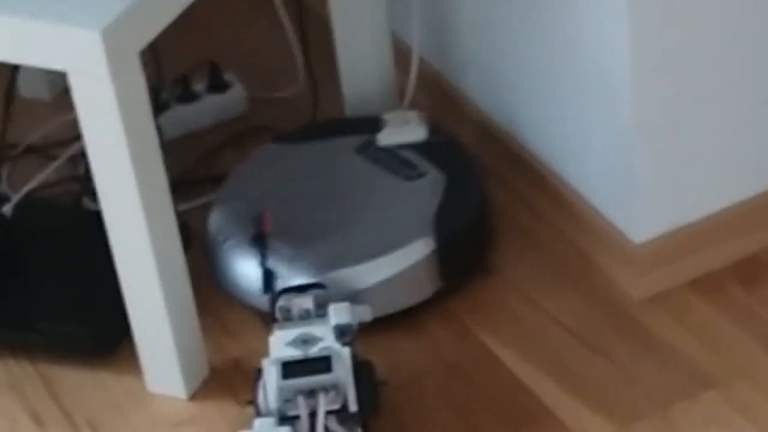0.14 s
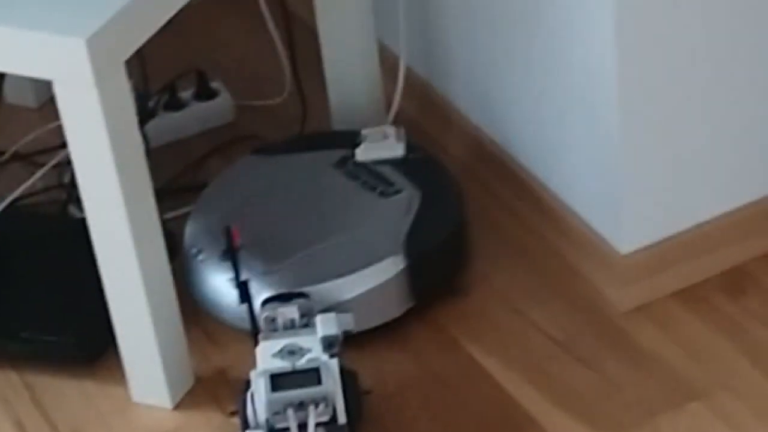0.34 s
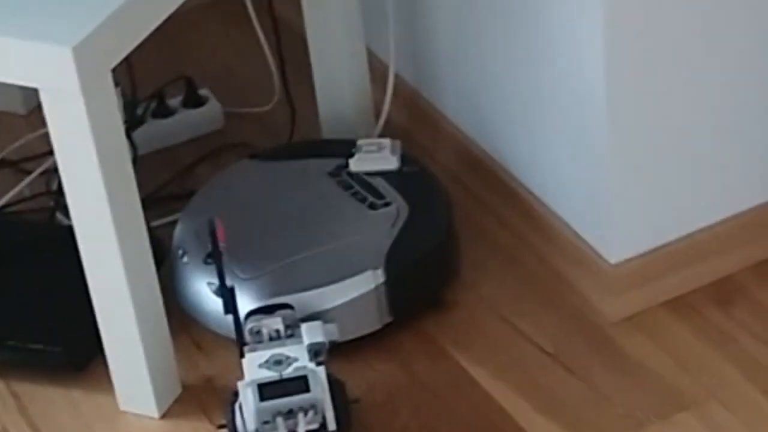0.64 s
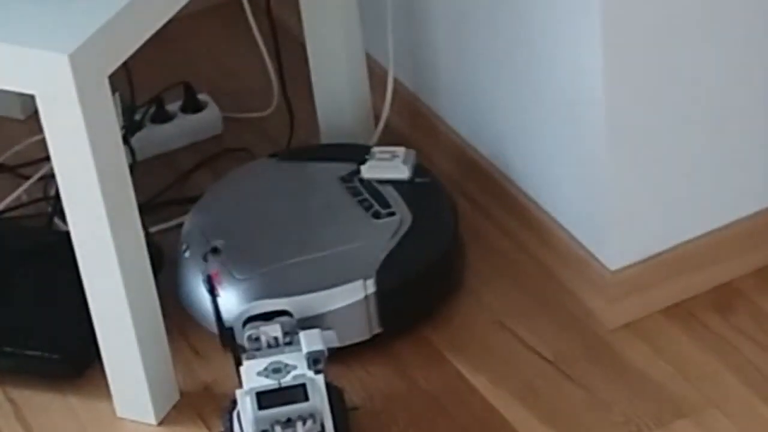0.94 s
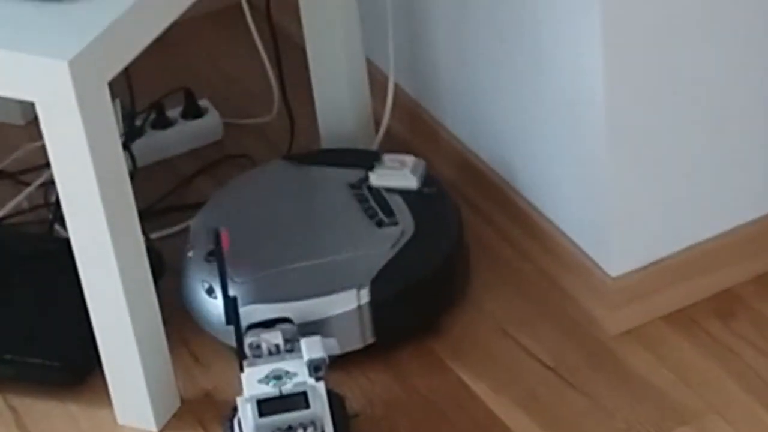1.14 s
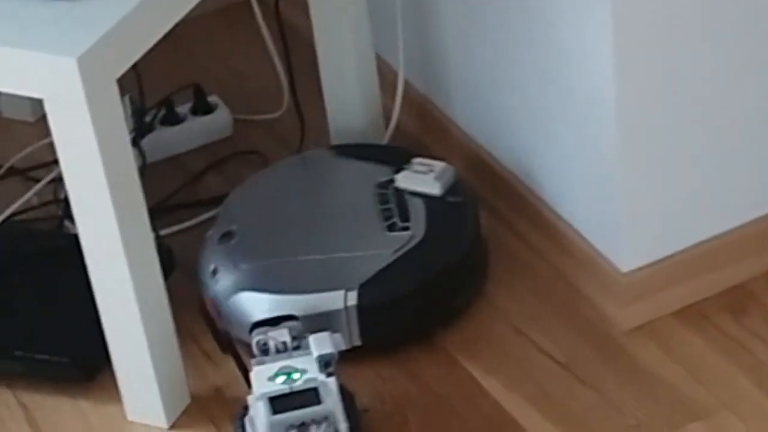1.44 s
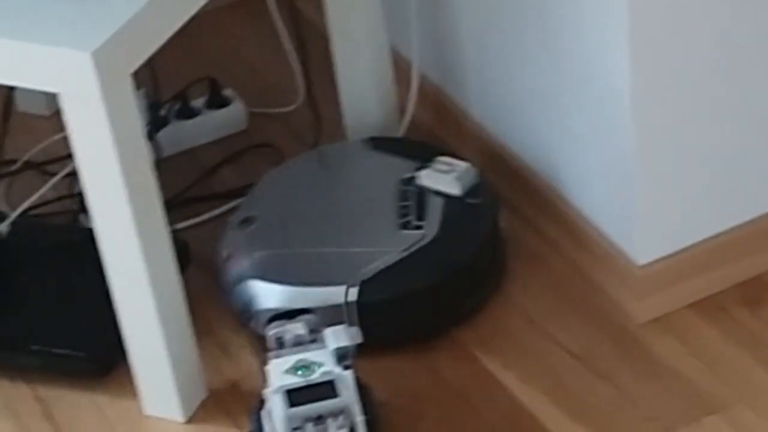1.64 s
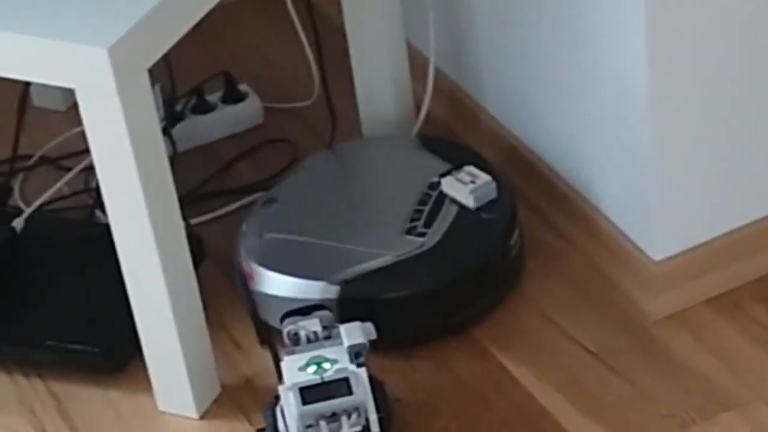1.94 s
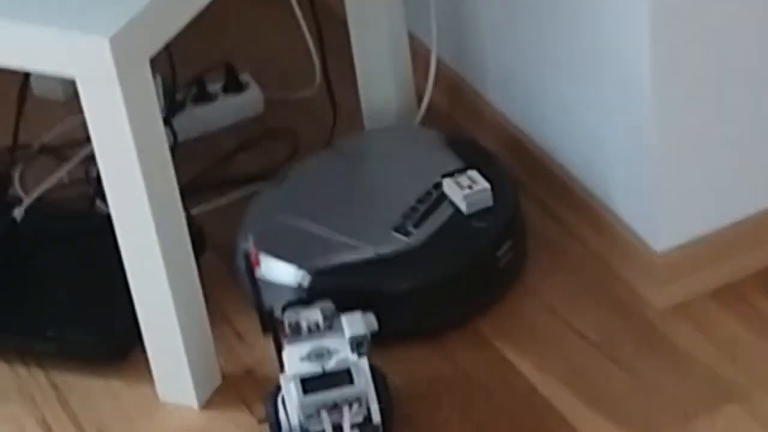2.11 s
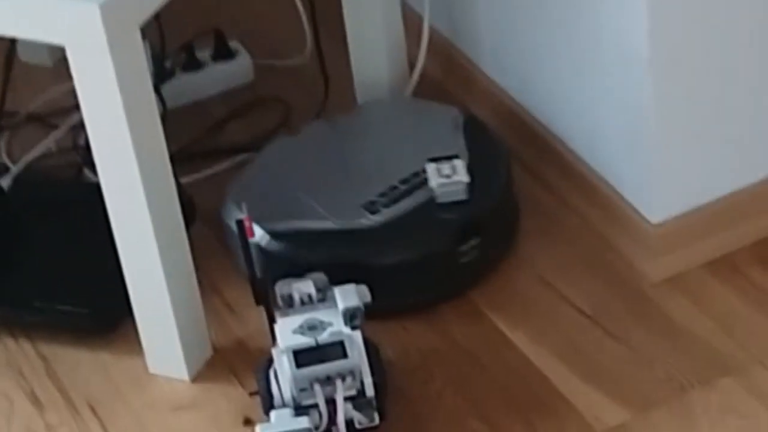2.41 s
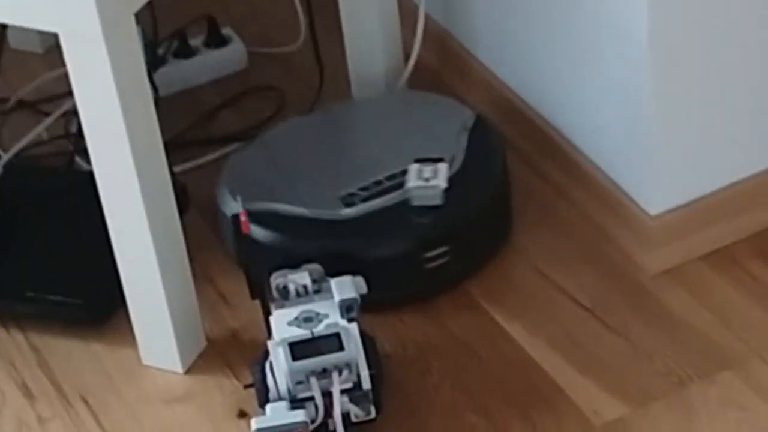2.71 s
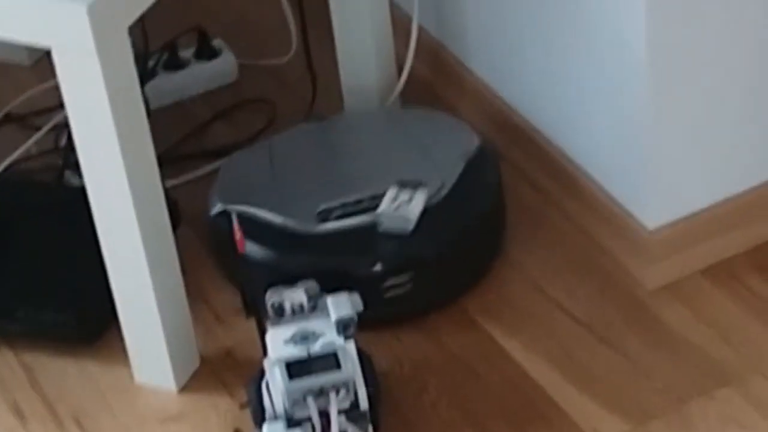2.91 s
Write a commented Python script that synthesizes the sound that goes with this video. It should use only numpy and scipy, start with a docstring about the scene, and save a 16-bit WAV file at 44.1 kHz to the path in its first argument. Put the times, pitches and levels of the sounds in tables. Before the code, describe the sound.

Steady vacuum motor hum and brush noise on a wooden floor indoors, joined from the start by a toy's grinding gears, thin squeals and plastic knocks, until after two seconds mostly the vacuum remains. Mono microphone, reverberant.

```python
"""A robot vacuum turns on a wooden floor in a bare, echoing room: motor harmonics hum, and noise whirs as brushes.
From the start a toy robot pushes against it for two seconds: random tooth impacts rasp, and thin tones whine.
Decaying impact noise and shell modes clatter in three bouts, near 0.2, 1.3 and 1.6 s.
From about 1.1 s a low motor note comes up; after 2.1 s the rasp sinks away, leaving the vacuum and a few whines.
Throughout, the whole sound flutters evenly, about 29 times a second; both channels are identical (mono)."""
import sys
import numpy as np
from scipy import signal
from scipy.fft import rfft, irfft, next_fast_len
from scipy.io import wavfile
from scipy.ndimage import map_coordinates

SR = 44100
rng = np.random.default_rng(int(sys.argv[2]) if len(sys.argv) > 2 else 0)


def log_audio(samples):
    """Write samples as a 16-bit WAV file to the path given in sys.argv[1]."""
    # one column per channel
    frames = np.atleast_2d(samples).T
    # limit to full scale, then quantise
    limited = np.clip(frames, -1, 1)
    pcm = np.round(limited * 32767).astype(np.int16)
    wavfile.write(sys.argv[1], SR, pcm)


N = 134946  # samples

MOTOR_HZ = 48.18  # fundamental of the vacuum's motor
MOTOR_ROOM_DB = 4  # echo of brushes, gears and scraping, relative to their direct sound


def amp(db):
    """Decibels to amplitude: 20 dB is a factor of ten."""
    return 10 ** (np.asarray(db) / 20)


def evened(x):
    """Normalization by effective value: scales to an rms of one."""
    return x / np.sqrt(np.mean(x ** 2) + 1e-20)


def level(points):
    """Amplitude envelope: gain over time, linear in decibels between (s, dB) points."""
    return amp(np.interp(np.arange(N) / SR, *np.transpose(points)))


def read(points, hz):
    """Spectral interpolation: reads (Hz, value) points on a log-frequency axis."""
    f, value = np.transpose(points)
    return np.interp(np.log(hz + 1), np.log(f + 1), value)


def add(mix, s, sound):
    """Superposition: mixes a sound in at a time in seconds."""
    part = mix[max(round(s * SR), 0):][:len(sound)]
    part += sound[:len(part)]


def colour(x, gain_db, size=4096):
    """Minimum-phase filtering: a causal response with the gain that gain_db gives for each frequency."""
    log_gain = np.log(amp(gain_db(abs(np.fft.fftfreq(size, 1 / SR)))))
    response = np.exp(np.conj(signal.hilbert(log_gain)))
    taps = np.fft.ifft(response).real[:size // 2]
    return signal.fftconvolve(x, taps)[:len(x)]


def band(hz, width_hz, size=N):
    """Resonance: noise confined to one narrow band, with an rms of one."""
    padded = next_fast_len(size, True)
    f = np.fft.rfftfreq(padded, 1 / SR)
    resonance = 1 / (1 + (2 * (f - hz) / width_hz) ** 4)
    noise = rfft(rng.standard_normal(padded))
    return evened(irfft(noise * resonance, padded)[:size])


def ticks(per_s, spread_db, size):
    """Random impulse train: tiny impacts of uneven strength and random sign."""
    strength = amp(spread_db * np.minimum(rng.exponential(1, size), 4))
    struck = rng.random(size) < per_s / SR
    return strength * rng.choice([-1., 1.], size) * struck


def drift(per_s, order=400):
    """Random modulation: straight lines join per_s normal random values each second."""
    return np.interp(np.arange(N) / SR * per_s, np.arange(order), rng.standard_normal(order))


def tones(pitches, gains, fading, fade_hz, wander, wander_per_s):
    """Modulated partials: lines fade in and out on their own while one shared speed bends them all."""
    f, spectrum = np.fft.rfftfreq(N, 1 / SR), np.zeros(N // 2 + 1, complex)
    near = np.arange(-60, 61)  # bins around each line
    skirt = np.exp(-.5 * (near * f[1] / fade_hz) ** 2)
    # a steady centre, with random sidebands that make the line fade
    line = fading * skirt / np.linalg.norm(skirt) + (near == 0)
    for hz, gain in zip(pitches, gains):
        phases = np.exp(2j * np.pi * rng.random(len(near)))
        spectrum[round(hz / f[1]) + near] += gain * line * phases
    steady = irfft(spectrum, N) * N / np.sqrt(2)  # a centre of gain one has an rms of one
    place = np.cumsum(1 + wander * drift(wander_per_s))
    return map_coordinates(steady, [place], order=3, mode="grid-wrap")


def sing(hz, width_hz):
    """Phase modulation: a tone of even level whose pitch jitters about a curve."""
    jitter = band(0, width_hz, size=len(hz)) + 1j * band(0, width_hz, size=len(hz))
    phase = 2 * np.pi * np.cumsum(hz) / SR
    return np.sqrt(2) * np.cos(np.angle(jitter) + phase)


def ripple(x, order=1500):
    """Modal response: passes a sound through the close, random resonances of a plastic housing."""
    ripple_db, spacing_hz = 3, 88.94
    padded = next_fast_len(N, True)
    f = np.fft.rfftfreq(padded, 1 / SR)
    bumps = np.interp(f / spacing_hz, np.arange(order), rng.standard_normal(order))
    # the ripple deepens toward the treble
    gain = amp(ripple_db * bumps * f / (f + 1500))
    return irfft(rfft(x, padded) * gain, padded)[:N]


def mesh(count=110):
    """Gear meshing: many faint partials, spread over 1 to 13 kHz, wander together with the speed."""
    pitches = 1000 + (np.arange(count) + rng.random(count)) * 12000 / count
    return evened(tones(pitches, np.ones(count), fading=1, fade_hz=5.5, wander=0.00297, wander_per_s=6))


def hum():
    """Harmonic series: the dense harmonics of the vacuum's motor, and the resonances of its body."""
    # harmonics that stand out: (multiple of the motor speed, level before the hum envelope [dB])
    orders = [(16, -52), (28, -48), (33, -47.5)]
    # the other harmonics: (frequency [Hz], level before the hum envelope [dB])
    harmonics = [(144, -64.5), (340, -58), (580, -52.5), (720, -53), (900, -52), (1100, -51.5), (1300, -52),
                 (1430, -68), (1600, -87), (1740, -54.5), (1900, -59), (3400, -69)]
    # the motor hum rises, dips near 1 s, then recovers: (time [s], gain [dB])
    hum_level = [(0, -8), (.7, -1), (.95, -5), (1.2, -4.5), (1.5, -4), (1.75, -4), (1.92, -4), (2.15, -1.5),
                 (2.7, -2), (3.06, -2.5)]
    # narrow resonances of the running vacuum: (frequency [Hz], width [Hz], level [dB])
    drones = [(251, 12.4, -54), (603.5, 96, -47.5)]
    strong, multiples = dict(orders), np.arange(3, 71)
    gains = amp([strong.get(k, read(harmonics, k * MOTOR_HZ)) for k in multiples])
    lines = tones(multiples * MOTOR_HZ, gains, fading=0.69, fade_hz=3, wander=0.00351, wander_per_s=8)
    body = sum(amp(db) * band(hz, width_hz) for hz, width_hz, db in drones)
    return lines * level(hum_level) + body


def note():
    """Line broadening: two notes at motor harmonics swell and sink while their phase wavers."""
    high_order, low_order, width_hz = 20, 8, 17
    # the motor's main note swells and sinks with the load: (time [s], level [dB])
    note_level = [(0, -46.5), (.69, -41), (1.01, -46), (1.2, -39.5), (1.48, -58), (1.71, -37.5), (1.8, -44),
                  (2.13, -38.5), (2.21, -42), (2.4, -37.5), (2.6, -38.5), (2.68, -36), (2.76, -39),
                  (3.06, -46)]
    # the motor's low note comes up as the vacuum turns: (time [s], level [dB])
    low_level = [(0, -55), (1.0, -57), (1.15, -46.5), (1.8, -47.5), (2.1, -46), (3.06, -43)]
    high = level(note_level) * sing(np.full(N, high_order * MOTOR_HZ), width_hz)
    low = level(low_level) * sing(np.full(N, low_order * MOTOR_HZ), width_hz)
    return high + low


def whistle():
    """Frequency modulation: a thin gear whistle of the vacuum drifts with the load."""
    # path of the whistle: (time [s], frequency [Hz], level before the echo [dB])
    path = [(0, 3466, -49), (.7, 3354, -52), (1.099, 3575, -51), (1.85, 3297, -58), (1.99, 3275, -38),
            (2.099, 3290, -57), (2.26, 3385, -44.5), (2.44, 3367, -54), (2.53, 3395, -44),
            (2.61, 3420, -51), (2.779, 3496, -45), (2.89, 3550, -58), (3.06, 3510, -54)]
    s, hz, db = np.transpose(path)
    pitch = np.interp(np.arange(N) / SR, s, hz)
    return level(np.transpose([s, db])) * sing(pitch, width_hz=35)


def brushes():
    """Impact noise: geared brushes snag and flick their bristles over the floor in a rush of air."""
    whir_db, mesh_db = -37.5, -3  # mesh relative to the flicks
    bristles_per_s, spread_db = 2500, 4.5
    snag_db, snags_per_s = 1.5, 170
    # colour of brushes and air: (frequency [Hz], relative density [dB per Hz])
    whir = [(20, -75), (40, -43), (75, -30.5), (110, -29), (170, -20.5), (240, -14), (380, -7.5),
            (490, -9.5), (580, -15), (810, -7), (1000, -8.5), (1400, -8.5), (1700, -7), (1900, -23),
            (3050, -16), (3600, -13.5), (4200, -17), (4800, -22.5), (6500, -30), (8100, -24.5), (9100, -39),
            (15500, -41)]
    # level of the brushes: (time [s], gain [dB])
    whir_level = [(0, 3.5), (.7, 0.5), (1.0, -1), (1.3, 1.5), (1.8, 2), (2.4, 1.5), (3.06, 2)]
    snags = amp(snag_db * drift(snags_per_s, order=800))
    flicks = evened(room(ticks(bristles_per_s, spread_db, N) * snags, MOTOR_ROOM_DB))
    source = flicks + amp(mesh_db) * mesh()
    rush = evened(colour(ripple(source), lambda hz: read(whir, hz)))
    return amp(whir_db) * level(whir_level) * rush


def gears():
    """Tooth impact: plastic teeth rattle and sing in the toy's gearbox over the drone of its motors."""
    teeth_per_s, spread_db, mesh_db = 900, 1, -4  # mesh relative to the teeth
    # colour of the gear rasp: (frequency [Hz], relative density [dB per Hz])
    rasp_colour = [(200, -27.5), (600, 1), (1250, -3), (2200, 0), (2700, 2), (3500, 0.5), (4800, -5),
                   (6500, -6), (7900, -5.5), (8900, -16.5), (10000, -15), (12500, -36), (15500, -40)]
    # how hard the gears work: (time [s], level of the rasp [dB])
    effort = [(0, -32), (.18, -36.5), (.4, -32), (.58, -34.5), (.68, -32.5), (.82, -32.5), (.95, -35),
              (1.27, -37.5), (1.45, -29.5), (1.66, -34.5), (1.82, -33), (1.98, -35), (2.1, -39),
              (2.35, -44), (3.06, -49)]
    # the motors drone while the gears work: (frequency [Hz], width [Hz], base level re rasp [dB])
    drone_hz, drone_width_hz, drone_db = (256, 25, -21)
    # the drone starts and stops: (time [s], gain on its base level [dB])
    drone_level = [(0, 5), (.3, -9), (.5, 7.5), (.8, 5), (.95, -12), (1.3, 5.5), (1.7, 0.5), (1.95, 9),
                   (2.1, 0.5)]
    teeth = evened(room(ticks(teeth_per_s, spread_db, N), MOTOR_ROOM_DB))
    source = teeth + amp(mesh_db) * mesh()
    rasp = evened(colour(ripple(source), lambda hz: read(rasp_colour, hz)))
    drone = amp(drone_db) * level(drone_level) * band(drone_hz, drone_width_hz)
    return level(effort) * (rasp + drone)


def whines():
    """Tonal vibration: gears, rubbing plastic and ringing shells sing, on steady or gliding pitches."""
    edge_s = .025
    # whines, squeals and rings: (start [s], length [s], first frequency [Hz], last frequency [Hz],
    # width [Hz], level before the echo [dB])
    whine_rows = [(0, 0.21, 1275, 1310, 93, -38.5), (0.242, 0.12, 1262, 1268, 25, -35.5),
                  (0.26, .1, 2632, 2632, 28, -43), (0.268, .32, 1890, 1980, 110, -39),
                  (.34, 0.228, 3130, 3190, 39, -47), (0.348, 0.13, 1280, 1310, 43, -35.5),
                  (1.306, 0.095, 590.6, 629, 85, -40.5), (0.581, .12, 1600, 1655, 59, -40),
                  (.63, 0.28, 2530, 2510, 49, -43), (0.633, 0.077, 3320, 3345, 44, -38),
                  (0.667, 0.088, 5930, 5930, 60, -46), (1.3, 0.077, 3190, 3180, 28, -31),
                  (1.3, 0.11, 2995, 2980, 16, -35), (1.306, 0.071, 3765, 3760, 35, -34),
                  (1.362, 0.8, 2700, 2697, 27, -48), (1.37, 0.32, 3185, 3175, 27, -43.5),
                  (1.6, 0.054, 2635, 2620, 30, -41), (1.72, .15, 2520, 2590, 55, -47),
                  (2.37, .12, 1640, 1735, 39, -46), (2.563, 0.092, 1670, 1735, 62, -39),
                  (2.734, 0.15, 1295, 1220, 86, -42), (2.844, 0.18, 1700, 1585, 50, -45)]
    out = np.zeros(N)
    for start, length, first_hz, last_hz, width_hz, db in whine_rows:
        t = np.arange(0, length, 1 / SR)
        swell = np.minimum(np.minimum(t, length - t) / edge_s, 1)
        pitch = np.linspace(first_hz, last_hz, len(t))
        add(out, start, amp(db) * swell * sing(pitch, width_hz))
    return out


def knock(db, bass_db, treble_db, ring_hz, ring_db):
    """Impact excitation: loose plastic parts clatter for a moment and the shells ring in their modes."""
    clatter_per_s, spread_db, clatter_t60_s, rise_s = 12000, 2.5, 0.078, 0.0012
    bass_hz, treble_hz, ring_octaves = 1430, 4570, 0.25
    # colour of every knock: (frequency [Hz], gain [dB])
    knock_colour = [(100, -31), (350, -20.5), (600, 3.5), (900, -3.5), (1300, 6), (2000, 6.5), (3500, 6),
                    (4800, -3.5), (6500, -4.5), (8000, 0.5), (9000, -12), (12000, -14.5), (15500, -28)]
    # modes of the plastic shells: (frequency [Hz], level before colouring [dB], t60 [s])
    shell = [(630, -64, 0.12), (1262, -56, 0.17), (1850, -41, 0.12), (2700, -47.5, 0.16), (3245, -53, .09),
             (3698, -46.5, 0.087)]
    t = np.arange(SR // 2) / SR
    ring = np.zeros(len(t))
    for hz, mode_db, t60_s in shell:
        decay = np.exp(-np.log(1000) * t / t60_s)
        ring += amp(mode_db) * decay * np.sin(2 * np.pi * (hz * t + rng.random()))
    envelope = np.exp(-np.log(1000) * t / clatter_t60_s) * (1 - np.exp(-t / rise_s))
    clatter = ticks(clatter_per_s, spread_db, len(t)) * envelope

    def tone_db(hz):
        """Spectral shaping: bass and treble shelves and one peak set the colour of this blow."""
        bass = bass_db / (1 + (hz / bass_hz) ** 4)
        treble = treble_db * (1 - 1 / (1 + (hz / treble_hz) ** 6))
        octaves = np.log2((hz + 1) / ring_hz)
        peak = ring_db * np.exp(-.5 * (octaves / ring_octaves) ** 2)
        return read(knock_colour, hz) + bass + treble + peak
    return amp(db) * colour(clatter / np.linalg.norm(clatter) + ring, tone_db)


def clatters():
    """Superposition of impacts: the toy knocks against the vacuum's shell in three bouts."""
    # knocks: (start [s], gain [dB], bass [dB], treble [dB], main ring [Hz], ring [dB])
    blows = [(0.1969, -2.5, -9, 2, 1520, 6.5), (0.2088, 2, 8, 1, 1900, -3),
             (0.233, 9.5, -1.5, -3.5, 2700, 3.5), (0.239, 7.5, 3, 4.5, 2270, -1),
             (0.2459, -6.5, 0, 7.5, 13000, 12), (.252, -1.5, 10.5, 3, 1250, 7),
             (0.3595, 0, -30, -2, 1930, 2), (1.305, -3, -21, 7.5, 3420, 11), (1.311, 4, 8.5, 6, 3260, 5.5),
             (1.3597, -5.5, -20, 5, 2960, 14), (1.5577, -3, -10, 2, 2900, 10.5),
             (1.5809, -0.5, 7.5, -4, 2950, 12.5), (1.589, 3.5, 2, -6, 2600, 5),
             (1.606, -6.5, 8, -0.5, 2500, 1)]
    out = np.zeros(N)
    for start, *blow in blows:
        add(out, start, knock(*blow))
    return out


def spray():
    """Friction noise: fine, bright grit as the toy scrapes along the shell."""
    grains_per_s, spread_db = 3700, 6
    # level of the fine hiss of scraping plastic: (time [s], level [dB])
    spray_level = [(.18, -48), (.25, -47), (.58, -52), (.68, -42), (.82, -47), (.95, -55), (1.28, -49),
                   (1.33, -44), (1.72, -51), (1.83, -43.5), (2.1, -75), (3.06, -77)]
    # its colour: (frequency [Hz], relative density [dB per Hz])
    spray_colour = [(2000, -34), (6000, 4), (10500, 0), (15500, -14)]
    grit = room(ticks(grains_per_s, spread_db, N), MOTOR_ROOM_DB)
    return level(spray_level) * evened(colour(grit, lambda hz: read(spray_colour, hz)))


def room(x, wet_db):
    """Reverberation: adds a dense noise echo that decays exponentially at its own rate in each band."""
    build_s = 0.0047
    # decay of the room: (frequency [Hz], t60 [s])
    decay = [(200, 1.09), (1000, 0.88), (2800, 1.16), (5000, 0.73), (8000, 1.12), (15000, 0.68)]
    hz, t, z = signal.stft(rng.standard_normal(2 * SR), SR, nperseg=256)
    z = z * amp(-60 * t / read(decay, hz)[:, None])
    tail = signal.istft(z * (1 - np.exp(-t / build_s)), SR)[1]
    return x + amp(wet_db) * signal.fftconvolve(x, tail / np.linalg.norm(tail))[:N]


def scene():
    """Superposition: both machines and their knocks in the room, the same in both channels."""
    vacuum = hum() + note() + brushes()
    toy = gears() + spray()
    singing = room(whistle() + whines(), wet_db=-9)
    knocks = room(clatters(), wet_db=-0.5)
    return np.tile(vacuum + toy + singing + knocks, (2, 1))


def record(dry):
    """Amplitude modulation: the level flutters evenly between two plateaus; then a low-pass band limit."""
    flutter_hz, crest_s = 28.94, .0219
    flutter_db, steepness, bias = 1.02, 7.1, 0.23  # the bias lengthens the louder part
    cycle = np.cos(2 * np.pi * flutter_hz * (np.arange(N) / SR - crest_s))
    fluttering = dry * amp(flutter_db * np.tanh(steepness * (cycle + bias)))
    low_pass = signal.firwin(511, 15750, window=("kaiser", 9), fs=SR)  # cutoff in Hz
    return signal.oaconvolve(fluttering, low_pass[None], "same")


dry = scene()
out = record(dry)
log_audio(out)
```